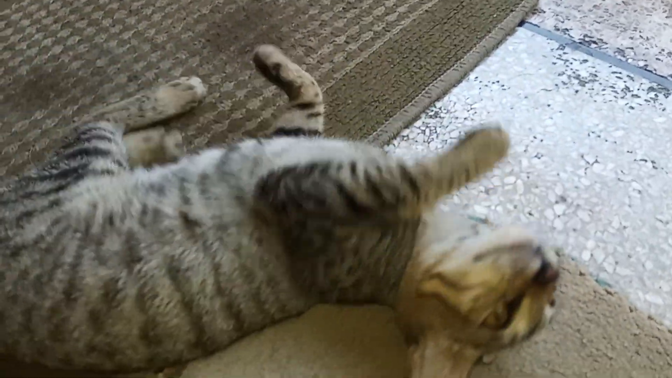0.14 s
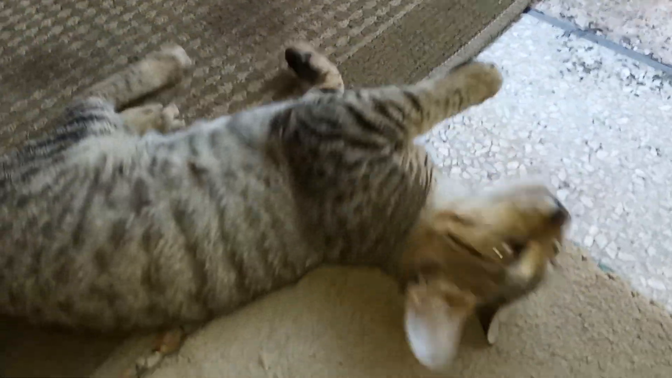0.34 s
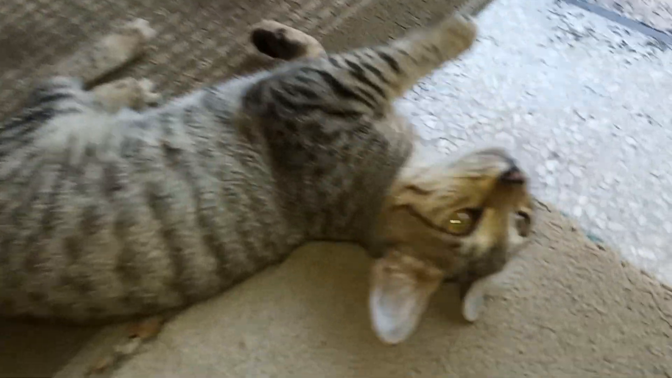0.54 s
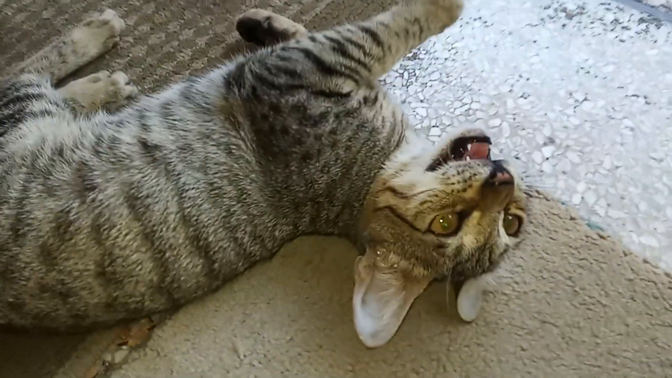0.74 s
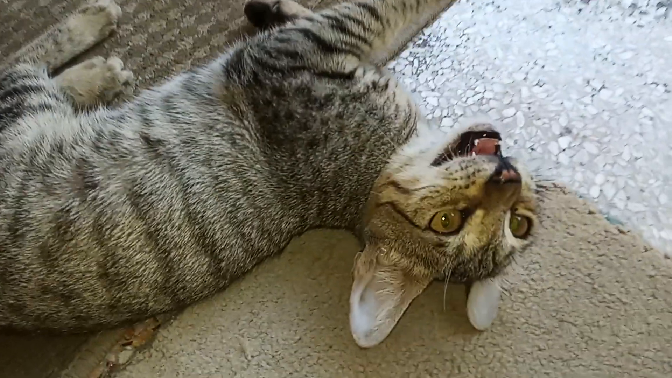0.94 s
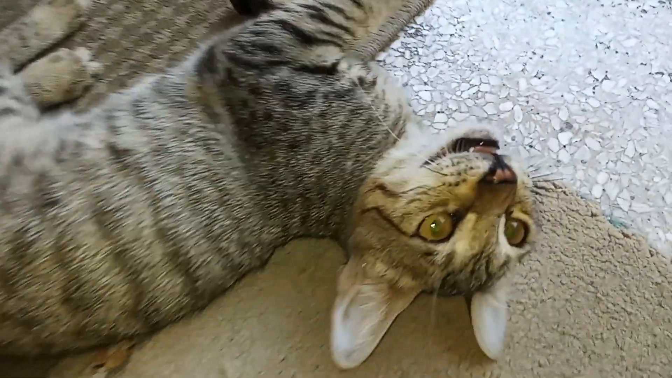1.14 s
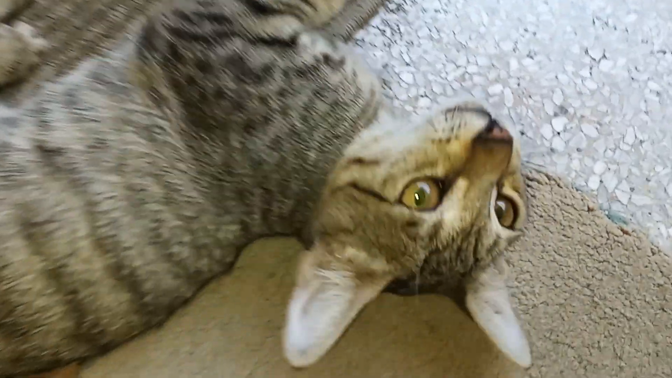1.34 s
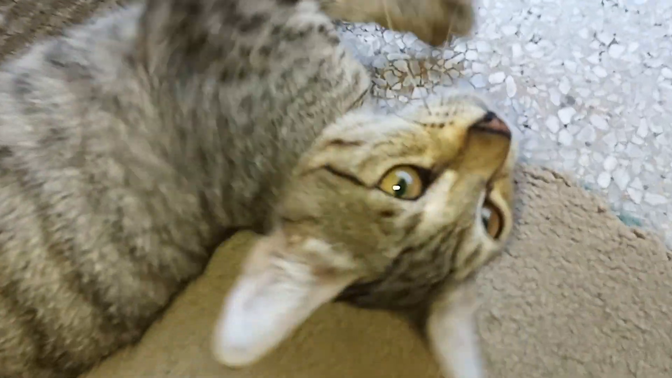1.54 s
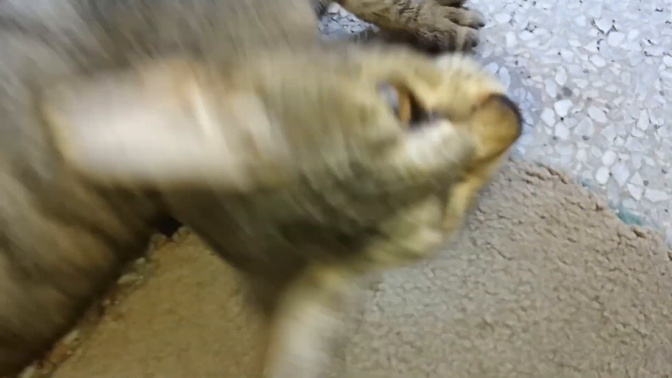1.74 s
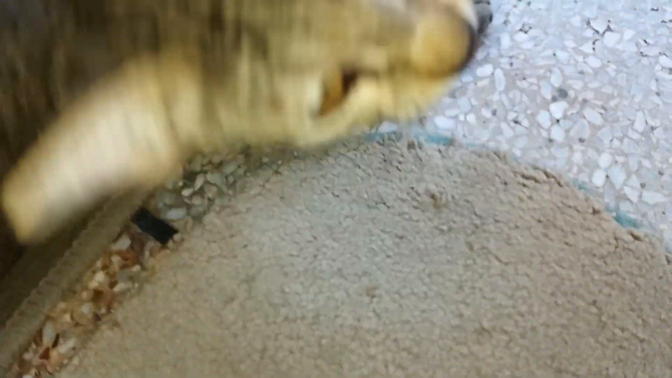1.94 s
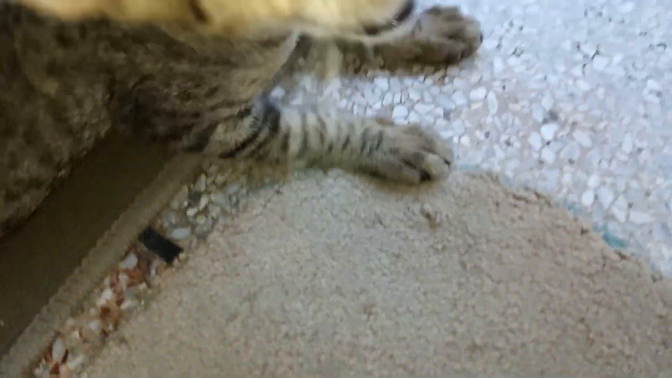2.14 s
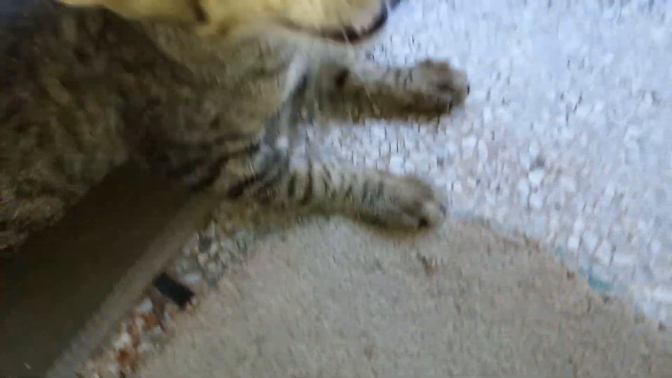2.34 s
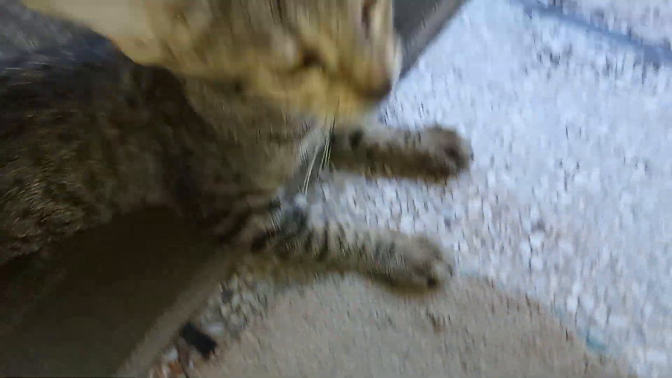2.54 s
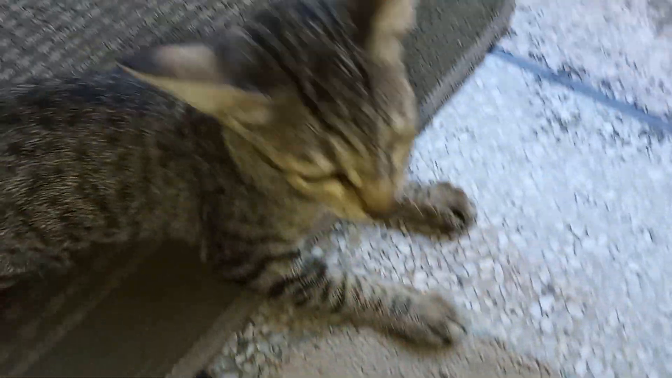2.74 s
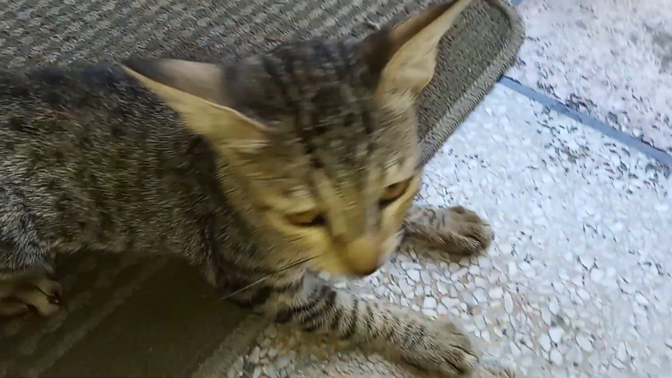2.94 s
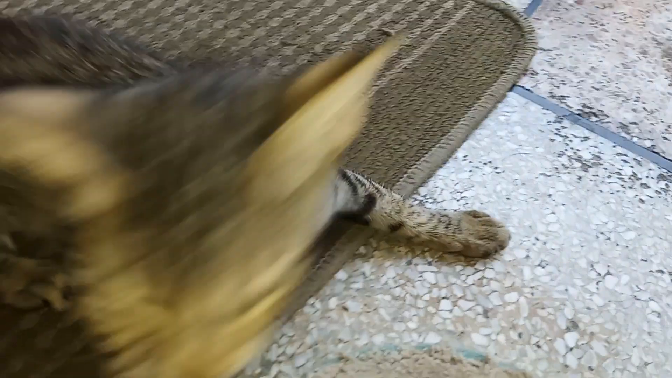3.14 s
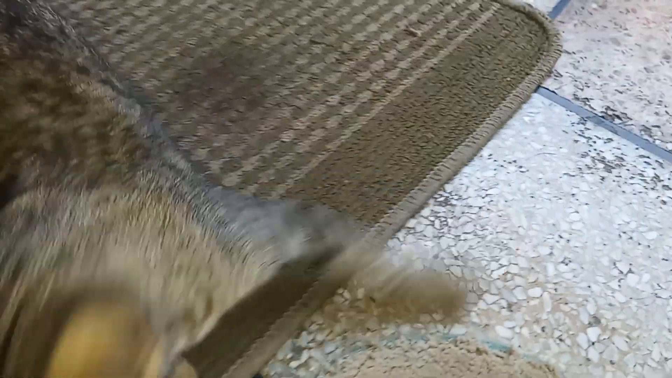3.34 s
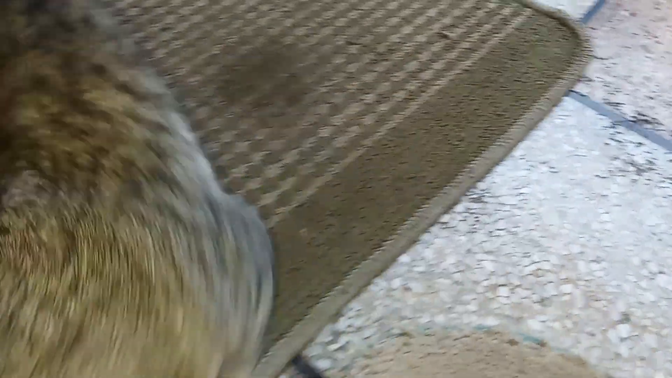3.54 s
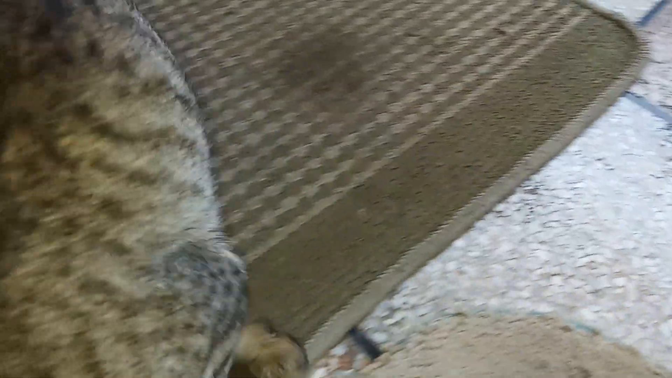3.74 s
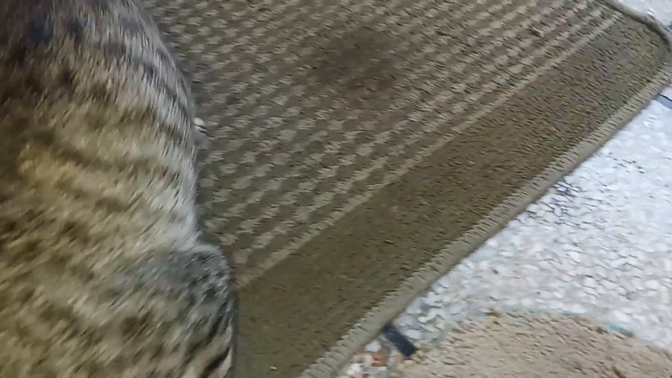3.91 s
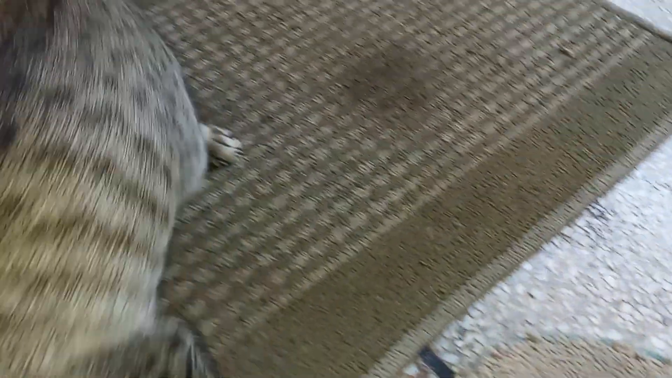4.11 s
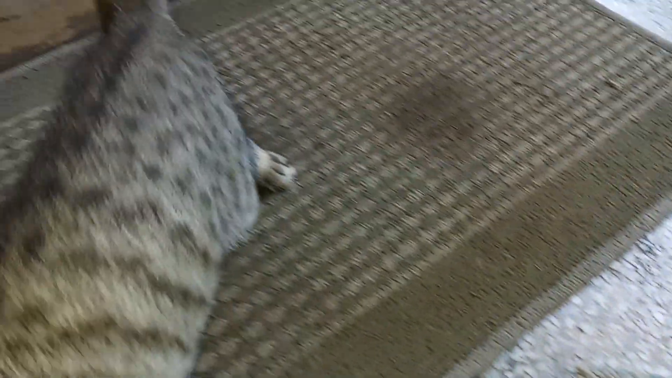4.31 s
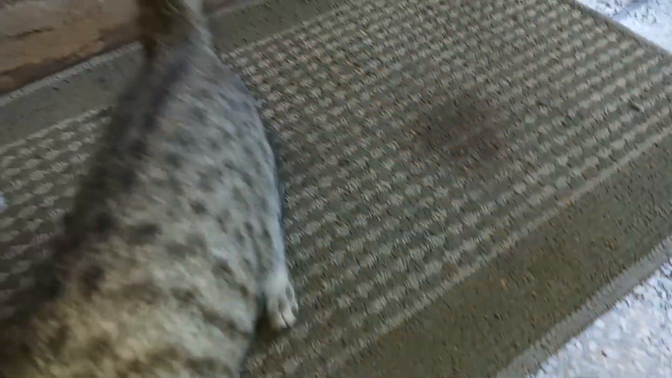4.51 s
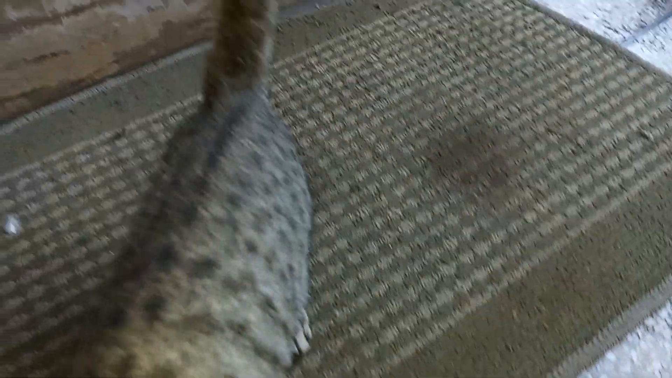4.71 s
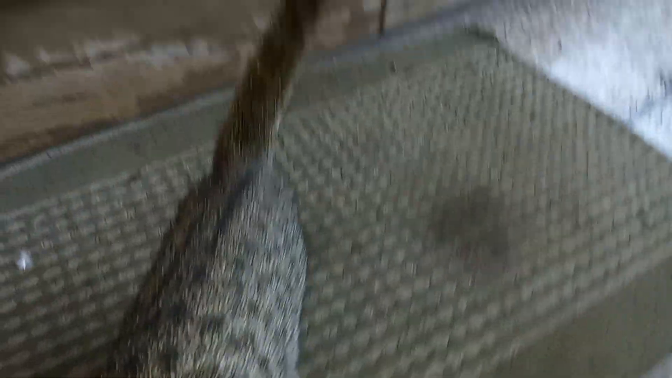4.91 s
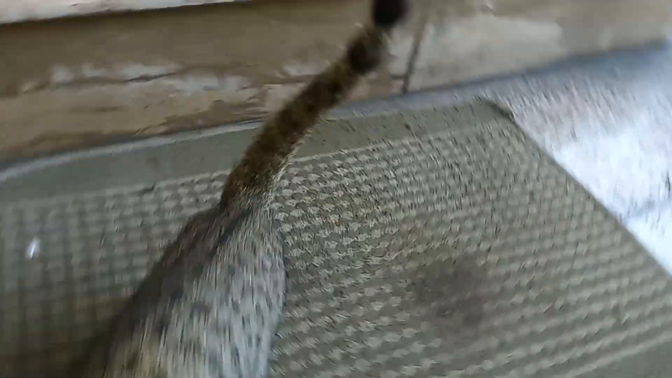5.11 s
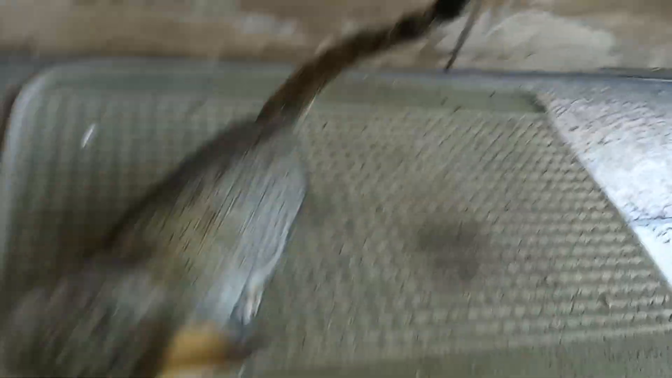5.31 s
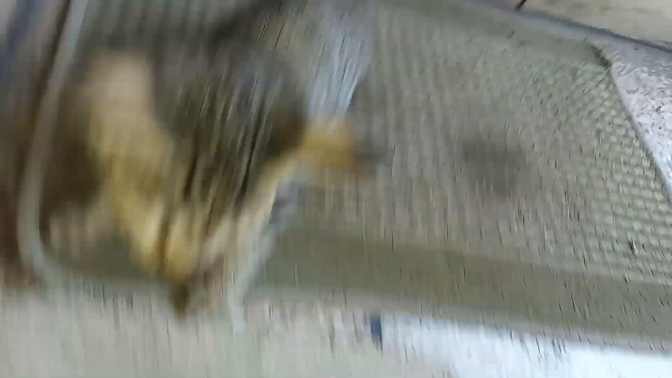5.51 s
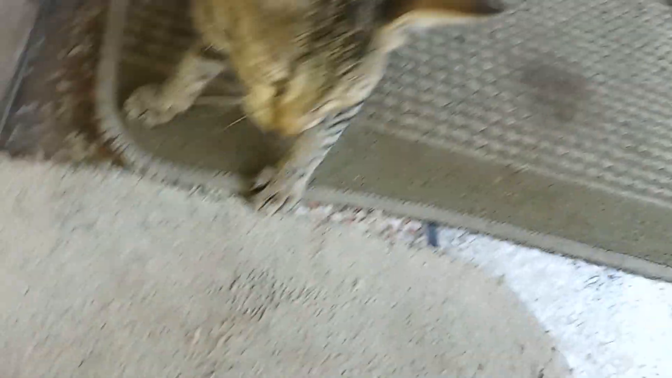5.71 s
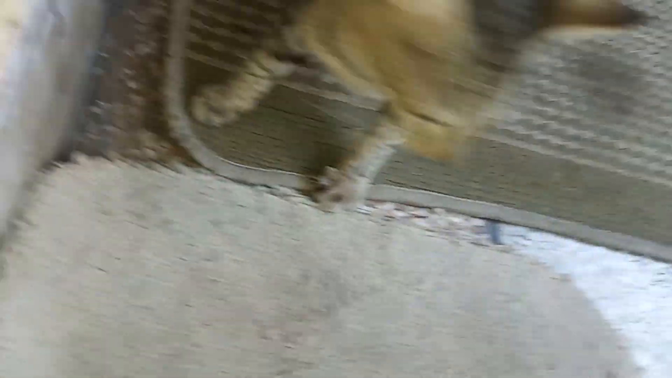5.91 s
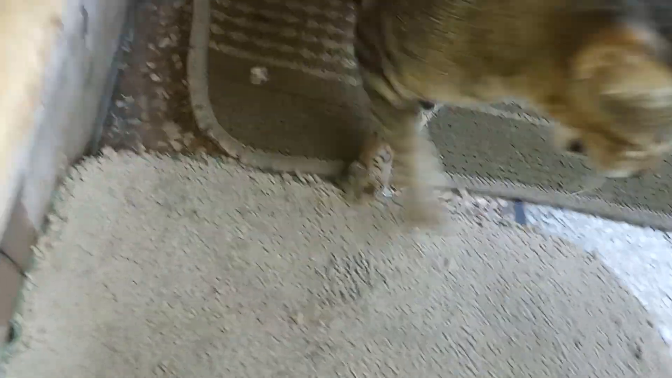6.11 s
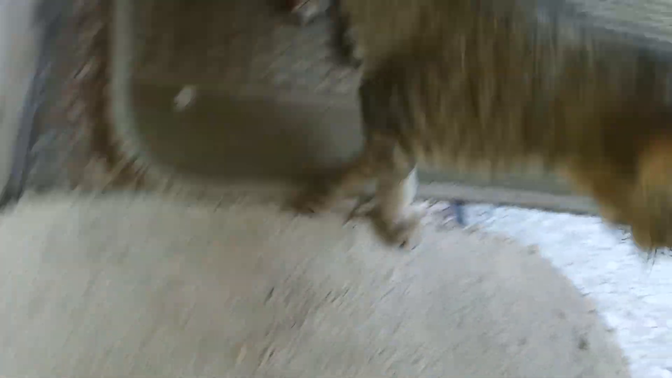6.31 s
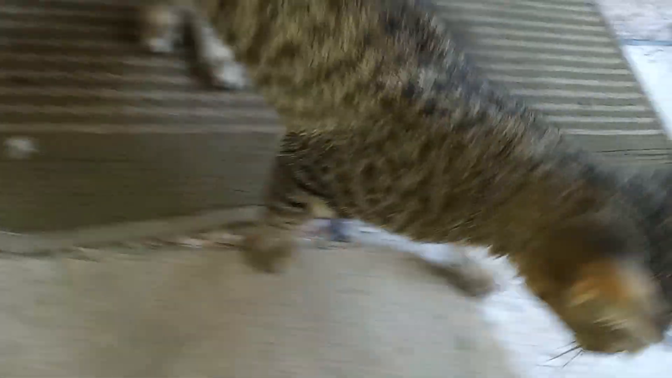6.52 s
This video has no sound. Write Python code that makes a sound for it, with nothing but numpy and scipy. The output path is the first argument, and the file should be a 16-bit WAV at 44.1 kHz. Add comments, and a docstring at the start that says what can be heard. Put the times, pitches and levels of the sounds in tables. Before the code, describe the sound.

Close microphone in a small quiet room. A cat lying on a mat gives a faint breathy meow, then a louder, open, bright one that rises and falls. After a pause with fur rustling comes a duller, more closed meow chopped by purring, then bustling paws and scuffs, and a last short soft meow. Low soft thuds, tiny clicks, light hiss and faint hum run underneath.

```python
"""A mat in a room, microphone close: a cat lying on the mat meows four times.
Calls are harmonic stacks shaped by mouth and throat; runs of purr twitches chop them, mostly near the end.
Fur and paws rustle (grains through mat resonances, bright hiss), a breath hisses during the first meow;
thuds are noise through two low room modes, small ticks are damped rings, faint whistles are gliding sines;
hum bands and hiss lie under it all."""
import sys
import numpy as np
from scipy import signal
from scipy.fft import rfft, irfft, next_fast_len
from scipy.io import wavfile
from scipy.ndimage import uniform_filter1d

SR = 44100
rng = np.random.default_rng(int(sys.argv[2]) if len(sys.argv) > 2 else 0)


def master(y):
    """Save y as 16-bit WAV."""
    cut = np.clip(np.atleast_2d(y).T, -1, 1)
    pcm = np.round(cut * 32767)  # scale
    wavfile.write(sys.argv[1], SR, pcm.astype(np.int16))


def how_loud(loudness_db):
    """Turn decibels into a plain amplitude multiplier (0 dB gives 1, 20 dB gives 10)."""
    steps = np.asarray(loudness_db, float) / 20
    return 10 ** steps


N = 293706

# shape of the four meows: t/s, pitch f/Hz, voice level/dB, mouth opening/1,
# fundamental via nose and chest re voice/dB, treble offset re voice/dB, lower tract resonance f/Hz
MEOW_POINTS = [(0.738, 622, -80.0, 1.09, 8, 33, 4030), (0.755, 644, -64, 1.1, 2.9, 19.5, 3860),
               (0.776, 647, -61.5, 1.2, 9.5, 23, 4670), (0.826, 684, -60, 1.15, -1.5, 18, 4590),
               (1.002, 685.0, -58, 0.79, 10.5, 11.5, 5050), (1.06, 655.0, -53.5, 0.78, 9, 4.5, 4970),
               (1.114, 653, -52, 0.67, 10.5, 3.5, 5280), (1.265, 588, -55.5, 0.64, 14, 2, 4930),
               (1.361, 617, -60, 0.57, 15.5, 5, 5310.0), (1.394, 592.4, -60.5, 0.8, 19.5, 2, 5110),
               (1.449, 619, -78, 0.5, -22, 7, 5030), (2.102, 612, -75, 1, 5, 22, 3900),
               (2.122, 607.0, -49.5, 0.58, 8, 9, 3780), (2.189, 681, -50.6, 0.88, -10, 8.6, 4640),
               (2.199, 687.5, -42, 0.93, -10.5, 14.5, 4940), (2.261, 710.7, -41, 1.05, -6, 13.5, 4950.0),
               (2.326, 709.4, -39, 1.03, -8.5, 9.5, 4920), (2.446, 672, -41, 0.87, -18, 6.5, 5100),
               (2.5, 640, -42.5, 0.67, -5, 3, 5570), (2.521, 633.3, -40, 0.58, -0.2, 0, 4860),
               (2.62, 548.5, -44.5, 0.49, 3.5, -10, 5720), (2.642, 602.5, -50.5, 0.57, 8, -23, 5120.0),
               (2.656, 474.4, -60.5, 0.65, 15.6, 0.5, 4930), (2.75, 475, -91.5, 0.65, 22, 20, 4200),
               (3.7, 440, -70, 0.2, 5, 2, 4400.0), (3.748, 457.6, -77, 0.5, 33, -8, 4420.0),
               (3.83, 531, -79.5, 0.53, 34.5, -1, 4440.0), (3.893, 583, -61.5, 0.57, 11.1, -2, 4350),
               (3.919, 603, -51, 0.53, -13, -12, 4470.0), (3.981, 622.4, -48.5, 0.59, -7, -24, 4540),
               (4.118, 586.8, -43, 0.29, -11, -27, 4380), (4.278, 558, -43, 0.27, -10.5, -35, 4640),
               (4.314, 550.7, -37.5, 0.16, -21.2, -48, 4600), (4.364, 584, -61, 0.37, 5, -24, 5400),
               (4.382, 563, -55.5, 0.2, -22, -0.5, 5300.0), (4.43, 529, -73.0, 0.6, -13, -12.0, 5260),
               (6.005, 437, -73, 1, 8, -10.7, 4100.0), (6.045, 512, -68.5, 0.59, 27, -17.0, 4110.0),
               (6.059, 556, -60.5, 0.6, 8, -16, 4000), (6.112, 617, -47, 0.46, -16, -21.4, 4250),
               (6.127, 621, -49, 0.68, -29, -20, 4260), (6.179, 638.4, -50, 0.95, -14, -25.0, 4620),
               (6.365, 598.6, -46.5, 0.49, -8, -35.5, 4660), (6.422, 569.5, -51.5, 0.53, -3, -48, 4360),
               (6.469, 519.7, -60.5, 0.54, 5, -25, 4540), (6.557, 585, -66, 0.4, 4.2, -34, 4620.0),
               (6.62, 558.7, -85, 0.8, 20, 1, 4800)]
# head posture per call: low treble/dB, top treble/dB, mouth Q/1, upper tract resonance start f/Hz, end f/Hz
HEAD_POSTURES = [(-10, -38, 1.18, 7170, 4150), (-10.5, -12, 1.64, 6940, 7440), (-5, -15, 2.08, 7500, 6600),
                 (7.5, 7, 0.9, 5420, 15000)]
# runs of evenly spaced purr twitches: first t/s, last t/s, first depth/dB, last depth/dB
PURR_RUNS = [(1.187, 1.365, 4, 15), (1.387, 1.403, 16, 7), (2.571, 2.639, 12, 9), (2.671, 2.727, 9, 1),
             (3.72, 3.763, 0, 21.5), (4.104, 4.133, 5.5, -2), (4.172, 4.353, 11, 18), (6.407, 6.568, 8, 2)]
# weak twitches of the treble alone, negative = lift: t/s, depth/dB
TREBLE_FLUTTERS = [(1.04, 10), (2.245, 0.5), (2.287, 4), (2.325, -2), (2.345, 6), (2.535, 4)]
# throat and microphone colour of the upper harmonics: f/Hz, level/dB
THROAT_COLOUR = [(3000, -2.5), (3500, 1.5), (4200, 6), (5000, 0), (5700, 1), (6500, -2.5), (7200, -2.5),
                 (8500, 4), (10500, -7.5), (13000, -21), (15000, -14)]
# where low, middle and top treble levels apply: f/Hz
TREBLE_CENTRES_HZ = [4540, 6390, 8460]
# the two moving tract resonances, lower and upper: boost/dB, half width/Hz
TRACT_PEAKS = [(14.5, 200), (10.5, 250)]
# strokes of fur and paws; the long bright swell at .72 is breath during the first meow:
# peak t/s, rise/s per 10 dB, fall/s per 10 dB, dull level/dB, bright level/dB
RUSTLE_SWELLS = [(0, .05, 0.074, -67, -67), (.2, 0.58, 0.1, -74, -66.5), (.46, 0.11, 0.076, -72.5, -68.5),
                 (.72, 0.1, 1.1, -93, -63), (1.44, 0.036, 0.022, -65, -65), (1.57, 0.14, 0.22, -67.5, -67),
                 (2.05, 0.018, .04, -72, -63.5), (2.8, 0.24, 0.11, -60, -68),
                 (2.905, 0.021, 0.018, -67, -55), (3.218, .06, 0.058, -73, -64),
                 (3.406, 0.089, 0.15, -72.5, -67.5), (3.69, 0.16, 0.9, -74, -66),
                 (4.365, 0.04, 0.024, -54, -64), (4.75, 0.12, .05, -69.5, -80),
                 (4.82, 0.095, 0.33, -72.5, -67), (5.1, 0.16, 0.29, -69.5, -63.5),
                 (5.35, 0.39, 0.13, -82, -62), (5.485, 0.031, 0.11, -50, -63),
                 (5.524, 0.055, .12, -49.5, -56.5), (5.635, 0.3, 0.24, -63.5, -56.5),
                 (5.75, 0.25, 0.29, -66.5, -60.5), (5.99, .02, 0.17, -68, -65.5),
                 (6.055, 0.017, 0.04, -63.5, -59.5), (6.53, 0.072, 0.088, -60, -66.5),
                 (6.65, 0.064, .1, -69.5, -63.5)]
# resonances of the mat: f/Hz, width/Hz (first of two passes), relative level/dB
MAT_RESONANCES = [(451, 102, 11.5), (685, 100, 12.5), (980, 560, 0.5), (1760, 1900, -10.5)]
# spectrum of the bright rustle and breath: f/Hz, relative density level/dB per Hz
BRIGHT_SPECTRUM = [(880, -40), (1500, -5.5), (3080, -7), (3460, -4), (3930, -2), (4930, -0.5), (7030, 6.5),
                   (8400, -19.5), (10800, -8), (13500, -21), (15800, -4)]
# soft thuds: t/s, lower mode level/dB, upper mode level/dB
THUD_EVENTS = [(.015, -50.5, -55.5), (.45, -54.5, -58.5), (0.778, -63, -62), (1.06, -58.5, -61.5),
               (1.2, -64, -66), (1.43, -71, -55), (1.87, -64, -59), (2.22, -62, -76), (2.3, -72, -59.5),
               (2.81, -63, -55), (2.9, -58, -52.5), (3.0, -73, -64), (3.21, -54.5, -74), (3.42, -62, -52.5),
               (3.69, -63, -77), (3.76, -65, -57), (3.96, -51, -56), (4.13, -71, -64), (4.32, -63, -63),
               (4.489, -57, -57), (4.65, -72, -61), (4.77, -52, -60), (4.83, -57.5, -73),
               (5.84, -84, -59.5), (5.94, -63, -60), (6.07, -57, -62), (6.16, -54.5, -65), (6.3, -55, -74),
               (6.57, -52, -52)]
# low room modes: f/Hz, half the width of each of two passes/Hz
ROOM_MODES = [(87, 5.5), (141, 8.3)]
# claw or grit clicks: t/s, level/dB before onset ramp and decay, f/Hz
TICK_EVENTS = [(1.094, -47, 7650), (1.475, -50, 1292), (1.58, -53, 2700), (1.73, -57, 1440),
               (2.051, -48, 8940), (2.824, -51, 1630), (2.857, -49, 1490), (4.376, -59, 5440),
               (4.896, -57, 10400), (6.062, -40, 4130), (6.075, -41, 6850)]
# faint whistles: t/s, length/s, start f/Hz, end f/Hz, level/dB before wavering
WHISTLE_GLIDES = [(4.581, 0.089, 3560, 3520, -74), (4.743, 0.034, 1700, 1720, -75),
                  (5.07, 0.054, 1500, 1510, -72), (5.088, 0.043, 2790, 2790, -68.5),
                  (5.13, 0.062, 2080, 2020, -72), (5.31, 0.05, 4780, 4700, -72),
                  (5.418, 0.051, 3450, 3430, -67), (5.58, 0.077, 3530, 3360, -68),
                  (5.562, 0.18, 4810, 5280, -62.5), (5.706, 0.21, 6960, 7250, -68)]
# spectrum of the hiss: f/Hz, relative density level/dB per Hz
FLOOR_SPECTRUM = [(18, -47), (36, -23), (79, -6), (278, -2.5), (362, -10), (715, -9.5), (1240, -16),
                  (2090, -16.5), (2450, -12), (3100, -18), (6810, -24), (8400, -31), (10600, -48),
                  (13100, -48), (15800, -23.5)]
# humming bands: f/Hz, width/Hz, level/dB
HUM_BANDS = [(190.7, 8.4, -71), (261.2, 15, -70.5), (290.4, 2.6, -72.5), (322, 26, -99), (2457, 11, -86),
             (6080, 140, -82.5)]

MOUTH_SHUT_HZ, MOUTH_OPEN_HZ, MOUTH_STEEPNESS = 832, 2477, 2.87   # opening 0 and 1
NASAL_WAVER_DB_PER_DB = .2   # per dB of fundamental under the voice
PURR_PERIOD_S = .036   # nominal
TWITCH_MS, TWITCH_MS_PER_DB = 7.5, -0.02   # nominal width; a deeper twitch is slightly shorter
HOARSE_HELD, HOARSE_ONSET, HOARSE_PURRING, SETTLE_S = .07, .9, .9, .04   # noise power share in the treble
HOARSE_PER_SAG = 1.6   # slack folds leak: share gained per share of pitch lost from the call's top
CROAK_ONSET, CROAK_END, CROAK_PURRING, BREAK_UP_S = .45, .8, .025, .13   # noise power share in every line
TURBULENCE_HZ = 190   # low-pass corner per pole of the noise around a hoarse line
STIR_DULL_DB, STIR_BRIGHT_DB = -85.5, -72   # the cat never lies quite still
HARDER_IS_HIGHER = 0.39   # dB per octave in the mat's ring per dB of stroke
THUD_RISE_S, THUD_FALL_S, RUMBLE_DB = 0.047, 0.061, -72   # times per 10 dB; level between thuds
ROOM_T60_S, ROOM_DB, WALL_CUT_HZ = .25, -22, 13000   # T60 before wall damping
FLOOR_DB = -69


def meows(wobble=0.0037, shimmer_db=1.5, patchy_db=5.0):
    """Vocal folds give a harmonic stack; hoarseness turns lines to noise, twitches drop pitch and level."""
    out, lost_db, dulled_db = np.zeros(N), dips(twitches()), dips(TREBLE_FLUTTERS)
    unsteady = 1 + .0012 * drift(120) + wobble * drift(27.2) - pitch_sag(lost_db)
    flutter = [drift(34) for _ in range(5)]
    turbulence = [drift(TURBULENCE_HZ) for _ in range(6)]
    patches = [drift(15) for _ in range(7)]   # the highest lines come and go
    rows = np.array(MEOW_POINTS)
    calls = np.split(rows, np.flatnonzero(np.diff(rows[:, 0]) > .3) + 1)
    for call, (low_db, top_db, q, start_hz, end_hz) in zip(calls, HEAD_POSTURES):
        at, (pitch, voice_db, opening, nasal_db, treble_db, lower_hz) = span(call)
        hoarse, croak = noise_shares(at, call[0, 0], pitch)
        mouth_hz = MOUTH_SHUT_HZ * (MOUTH_OPEN_HZ / MOUTH_SHUT_HZ) ** opening
        peaks_hz = lower_hz, np.linspace(start_hz, end_hz, len(at))
        nasal_db = nasal_db + NASAL_WAVER_DB_PER_DB * np.minimum(nasal_db, 0) * patches[0][at]
        phase = 2 * np.pi * np.cumsum(pitch * unsteady[at]) / SR
        voice = 0
        for k in range(1, 25):
            hz = k * pitch
            if k <= 4:
                shaped_db = nasal_db if k == 1 else mouth_db(hz / mouth_hz, q)
                level_db = voice_db + shaped_db - lost_db[at] * (1 + 0.16 * (k - 1))
            else:
                level_db = voice_db + treble_db - 13.5 + tract_db(hz, low_db, top_db, peaks_hz)
                level_db -= .7 * lost_db[at] + dulled_db[at]
                level_db += patchy_db * np.clip(k / 6 - 1, 0, 1) * patches[k % 7][at]
            level_db = level_db + shimmer_db * min(k / 5, 1.5) * flutter[k % 5][at]
            noisy = np.maximum(croak, hoarse * min(1, k / 8) ** 4)
            in_phase, quadrature = turbulence[k % 6][at], turbulence[(k + 3) % 6][at]
            tone = np.sqrt(1 - noisy) * np.sin(k * phase + 0.26 * k)
            noise = np.sqrt(noisy / 2) * (in_phase * np.sin(k * phase) + quadrature * np.cos(k * phase))
            voice = voice + np.sqrt(2) * how_loud(level_db) * (tone + noise) * (hz < 15700)
        out[at] = voice * np.minimum(1, np.minimum(at - at[0], at[-1] - at) / 200)
    return out


def pitch_sag(lost_db):
    """Folds slacken at a twitch and tighten again in about 15 ms; relative pitch loss about its local mean."""
    slack = signal.lfilter([1 / 600], [1, 1 / 600 - 1], lost_db)
    return .014 * (slack - uniform_filter1d(slack, size=3000))


def noise_shares(at, start_s, pitch):
    """Leaky folds: noise power shares over one call, in the treble (hoarse) and in every line (croak)."""
    since, left = (at - at[0]) / SR, (at[-1] - at) / SR
    purr_s = min(run[0] for run in PURR_RUNS if run[0] > start_s)
    purring = np.clip((at / SR - purr_s) / SETTLE_S, 0, 1)
    onset = HOARSE_HELD + (HOARSE_ONSET - HOARSE_HELD) * np.exp(-since / SETTLE_S)
    sagging = HOARSE_HELD + HOARSE_PER_SAG * (1 - pitch / np.maximum.accumulate(pitch))
    hoarse = np.minimum(.95, np.maximum(np.maximum(onset, HOARSE_PURRING * purring), sagging))
    croak = CROAK_ONSET * np.exp(-2 * since / SETTLE_S)
    croak = croak + CROAK_END * np.clip(1 - left / BREAK_UP_S, 0, 1) + CROAK_PURRING * purring
    return hoarse, croak


def mouth_db(u, q):
    """Mouth as a resonant low-pass; u is frequency over mouth resonance."""
    return -MOUTH_STEEPNESS * 10 * np.log10(((1 - u * u) * q) ** 2 + u * u)


def tract_db(hz, low_db, top_db, peaks_hz):
    """Posture tilt, throat colour and two moving resonances on the upper harmonics."""
    band_db = np.interp(np.log(hz), np.log(TREBLE_CENTRES_HZ), [low_db, 0, top_db])
    boost_db = sum(db / (1 + ((hz - peak) / width) ** 2) for peak, (db, width) in zip(peaks_hz, TRACT_PEAKS))
    return band_db + at_hz(THROAT_COLOUR, hz) + boost_db


def twitches():
    """Each purr run as single twitches: (t/s, depth/dB)."""
    events = []
    for first, last, first_db, last_db in PURR_RUNS:
        count = max(2, round((last - first) / PURR_PERIOD_S) + 1)
        events.extend(np.linspace([first, first_db], [last, last_db], count))
    return events


def dips(events):
    """Level lost over time, dB: each dip falls fast and recovers more slowly."""
    t, out = np.arange(N) / SR, np.zeros(N)
    for s, depth_db in events:
        near = slice(int((s - .04) * SR), int((s + .04) * SR))
        width_ms = (TWITCH_MS + TWITCH_MS_PER_DB * abs(depth_db)) * np.where(t[near] < s, .7, 1.7)
        out[near] += depth_db * np.exp(-4 * np.log(2) * ((t[near] - s) * 1000 / width_ms) ** 2)
    return out


def ticks(t60_s=.012):
    """Claw or grit clicks: a short damped ring each."""
    out, t = np.zeros(N), np.arange(1200) / SR
    for s, level_db, hz in TICK_EVENTS:
        envelope = how_loud(level_db - 60 * t / t60_s) * np.minimum(1, t / 0.0012)
        out[int(s * SR):][:len(t)] += envelope * np.sin(2 * np.pi * hz * t)
    return out


def rustles(grains_per_s=1200):
    """Fur dragged over the weave: grains ring the mat's dull resonances; bright hiss for fur and breath."""
    sizes = how_loud(3.5 * np.minimum(rng.exponential(1, N), 4)) * rng.choice([-1, 1], N)
    clumped_rate = grains_per_s * how_loud(2.5 * drift(20))
    grains = sizes * (rng.random(N) < clumped_rate / SR)
    bright = coloured(BRIGHT_SPECTRUM) * how_loud(1.1 * drift(60))
    s, rise_s, fall_s, dull_db, bright_db = np.transpose(RUSTLE_SWELLS)
    stroke_db = swells(s, rise_s, fall_s, dull_db, STIR_DULL_DB)
    plain, tilted = 0, 0
    for hz, width_hz, db in MAT_RESONANCES:
        ring = how_loud(db) * resonate(resonate(grains + 1e-18, hz, width_hz), hz, 2 * width_hz)
        octaves = np.clip(np.log2(hz / 550), -.5, .25)
        plain = plain + ring
        tilted = tilted + ring * how_loud(HARDER_IS_HIGHER * (stroke_db + 54.5) * octaves)
    dull = tilted / np.std(plain)
    return how_loud(stroke_db) * dull + how_loud(swells(s, rise_s, fall_s, bright_db, STIR_BRIGHT_DB)) * bright


def thuds(push_db=-19, waver_db=3.0):
    """Soft thuds excite two low room modes with noise and add a deeper push."""
    s, *peaks_db = np.transpose(THUD_EVENTS)
    levels_db = [swells(s, THUD_RISE_S, THUD_FALL_S, db, RUMBLE_DB) + waver_db * drift(4.9) for db in peaks_db]
    out = np.zeros(N)
    for (hz, width_hz), level_db in zip(ROOM_MODES, levels_db):
        rung = resonate(resonate(rng.standard_normal(N), hz, width_hz * 2), hz, width_hz * 2)
        power = uniform_filter1d(rung ** 2, size=2500) + 0.17 * np.mean(rung ** 2)
        out += how_loud(level_db) * rms_one(rung / np.sqrt(power))   # evened out
    push = resonate(resonate(rng.standard_normal(N), 39, 40), 39, 40)
    return out + how_loud(levels_db[0] + push_db) * rms_one(push)


def whistles():
    """Thin gliding sines; slow noise wavers their level and blurs their pitch."""
    out, waver, blur = np.zeros(N), .7 + .6 * drift(70), 1 + .008 * drift(60)
    for s, length_s, start_hz, end_hz, level_db in WHISTLE_GLIDES:
        hz = np.linspace(start_hz, end_hz, int(length_s * SR))
        hz = hz * blur[int(s * SR):][:len(hz)]
        envelope = np.sqrt(2) * how_loud(level_db) * np.hanning(len(hz)) ** 0.14
        out[int(s * SR):][:len(hz)] += envelope * np.sin(2 * np.pi * np.cumsum(hz) / SR)
    return out * waver


def room(x):
    """Eight feedback delays, duller on every round."""
    size = next_fast_len(N + SR)
    hz = np.fft.rfftfreq(size, 1 / SR)
    dull = 1 / np.sqrt(1 + (hz / WALL_CUT_HZ) ** 2)
    tail = 0
    for lag_s in rng.uniform(.012, 0.044, 8):
        loop = dull * how_loud(-60 * lag_s / ROOM_T60_S) * np.exp(-2j * np.pi * hz * lag_s)
        tail = tail + loop / (1 - loop)
    return irfft(rfft(x, size) * tail, size)[:N]


def background():
    """Gently drifting hiss, narrow noise bands as hum, and a flickering band at the very top."""
    top = rms_one(resonate(rng.standard_normal(N), 16400, 1100)) * how_loud(-83.5 + 5.0 * drift(6))
    hum = sum(how_loud(db) * rms_one(resonate(rng.standard_normal(N), hz, width)) for hz, width, db in HUM_BANDS)
    return how_loud(FLOOR_DB + 1.0 * drift(8.1)) * coloured(FLOOR_SPECTRUM) + hum + top


def rms_one(x):
    """Scale to unit power."""
    return x / np.sqrt(np.mean(x ** 2) + 1e-20)


def span(rows):
    """Sample range of a table and its columns joined by straight lines."""
    s, *columns = np.transpose(rows)
    at = np.arange(int(s[0] * SR), min(int(s[-1] * SR), N))
    return at, [np.interp(at / SR, s, c) for c in columns]


def at_hz(points, hz):
    """Read a spectrum on a log-frequency axis."""
    points_hz, points_db = np.transpose(points)
    return np.interp(np.log(hz), np.log(points_hz), points_db)


def drift(rate_hz):
    """Slow random signal, rms 1: noise twice through a one-pole low-pass."""
    r = np.exp(-2 * np.pi * rate_hz / SR)
    slow = signal.lfilter([1], [1, -2 * r, r * r], rng.standard_normal(N + SR))[SR:]
    return rms_one(slow)


def resonate(x, hz, width_hz):
    """Two-pole resonance with gain 1 on top."""
    r = np.exp(-np.pi * width_hz / SR)
    poles = [1, -2 * r * np.cos(2 * np.pi * hz / SR), r * r]
    return signal.lfilter([(1 - r * r) / 2, 0, (r * r - 1) / 2], poles, x)


def coloured(spectrum):
    """White noise shaped to a spectrum; rms 1."""
    hz = np.maximum(np.fft.rfftfreq(N, 1 / SR), 1)
    return rms_one(irfft(rfft(rng.standard_normal(N)) * how_loud(at_hz(spectrum, hz)), N))


def swells(s, rise_s, fall_s, peak_db, rest_db):
    """Level over time, dB: each event climbs to its peak and sinks again, above a resting level."""
    t = np.arange(0, N + 64, 64) / SR
    s, rise_s, fall_s, peak_db = [np.reshape(column, (-1, 1)) for column in (s, rise_s, fall_s, peak_db)]
    late = t - s
    loss_db = 10 * np.maximum(late / fall_s, -late / rise_s)
    level_db = np.maximum((peak_db - loss_db).max(axis=0), rest_db)
    return np.interp(np.arange(N) / SR, t, level_db)


def scene():
    """Voice and ticks with their room tail, plus the dry layers; one channel."""
    cat = meows() + ticks()
    mix = cat + how_loud(ROOM_DB) * room(cat) + thuds() + rustles() + whistles() + background()
    return mix[None]


def roll_off(x):
    """The treble ends steeply here."""
    return signal.sosfilt(signal.butter(12, 15910, fs=SR, output="sos"), x)


def record(dry):
    """Turns the finished mix into the output signal."""
    return roll_off(dry)


dry = scene()
out = record(dry)
master(out)
```